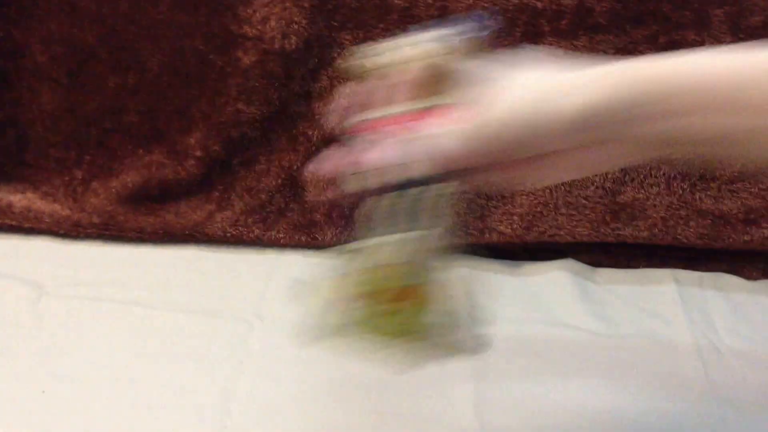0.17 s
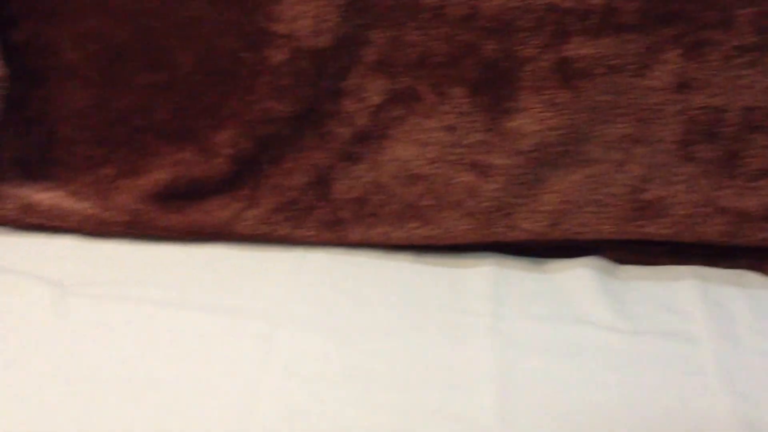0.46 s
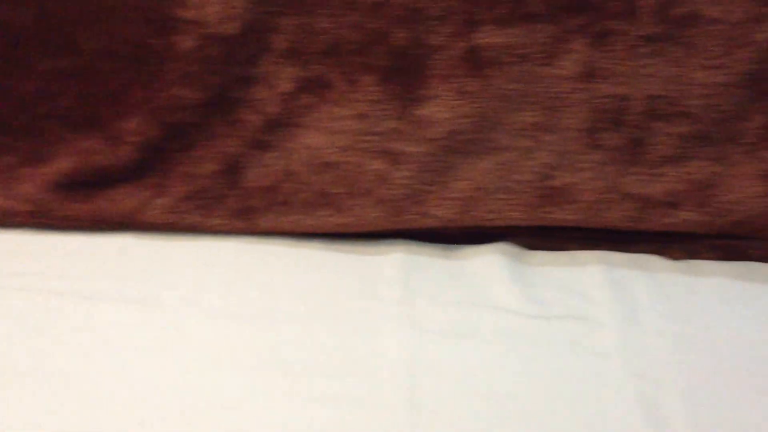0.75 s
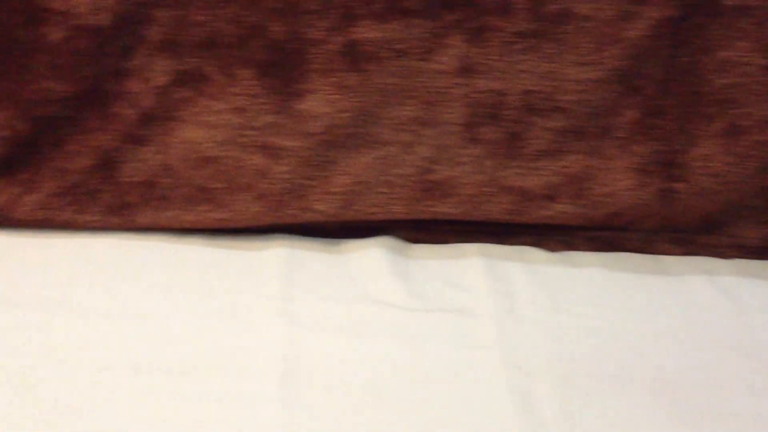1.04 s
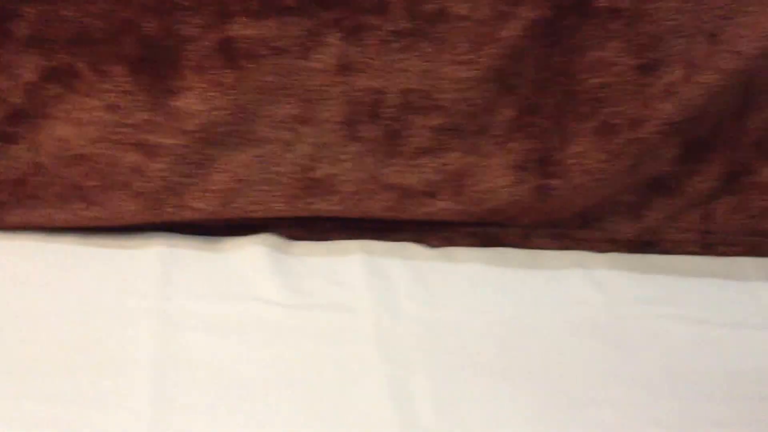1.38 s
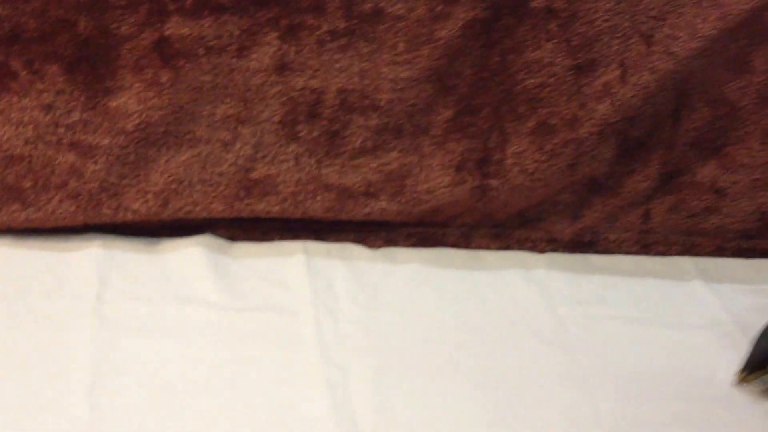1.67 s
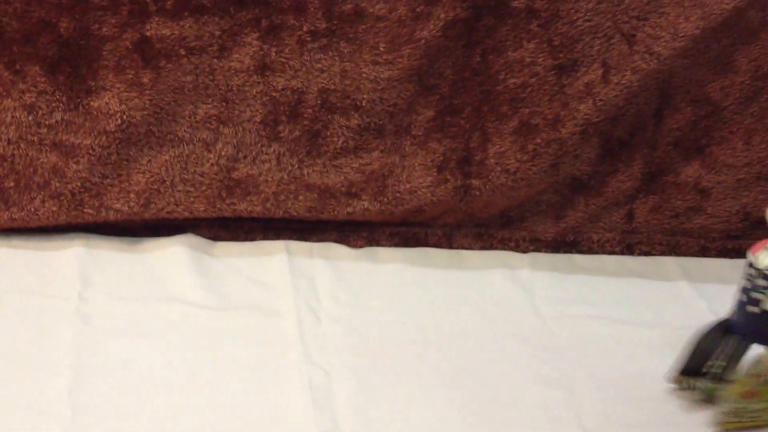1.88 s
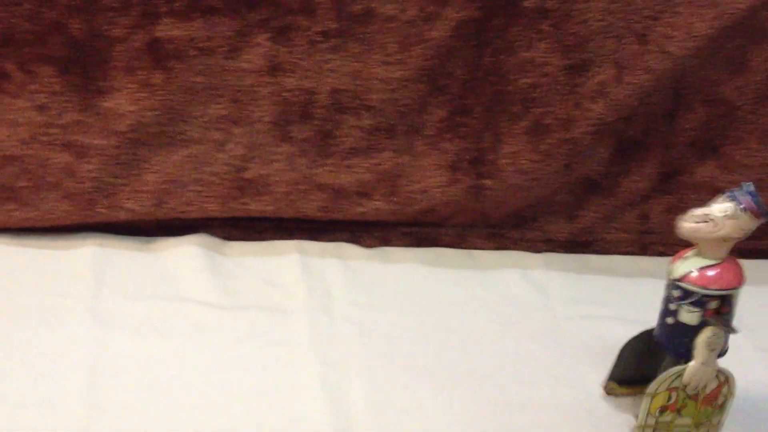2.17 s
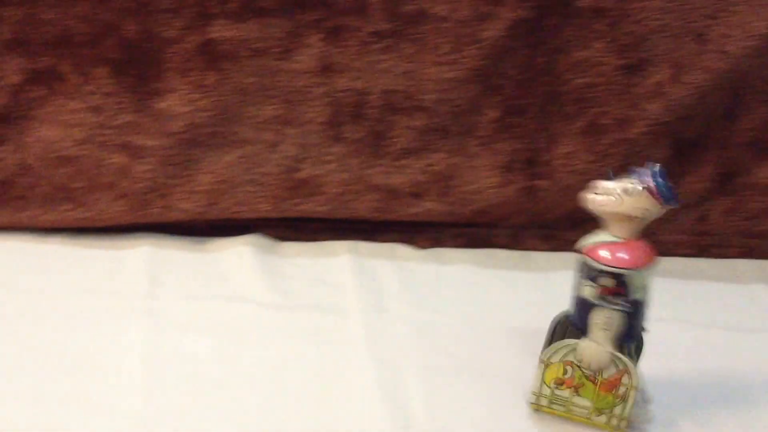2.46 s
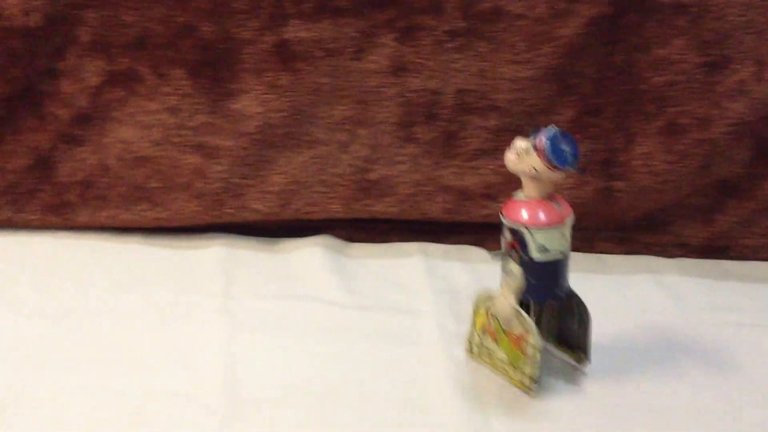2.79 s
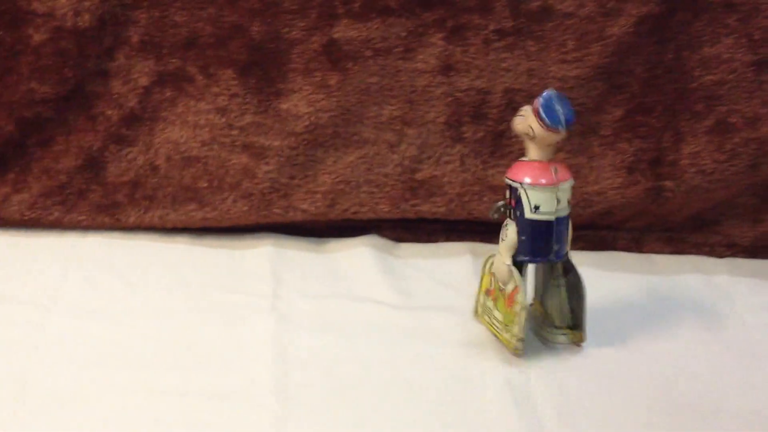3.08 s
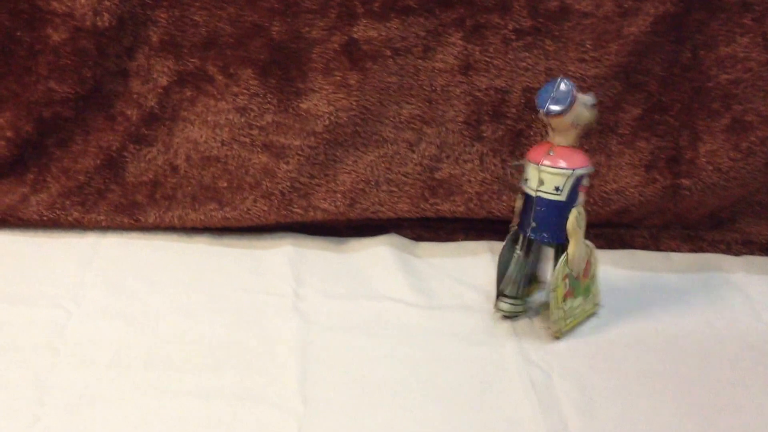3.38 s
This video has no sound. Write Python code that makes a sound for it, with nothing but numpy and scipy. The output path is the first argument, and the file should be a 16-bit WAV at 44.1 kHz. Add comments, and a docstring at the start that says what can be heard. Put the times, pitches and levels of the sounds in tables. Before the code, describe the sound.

Wind-up tin toy walking on a cloth-covered table, bright metallic clacks, loose rattles and gear whirring.

```python
"""A tin wind-up toy walks over a cloth-covered table in a small room.
Its cranked legs knock against the thin shell, fast while it is lifted, then in slower, limping steps.
Hard clacks and softer rattles are showers of tiny contacts that ring the tin, each at its own spot.
The clockwork whirrs underneath as uneven gear ticks, and some knocks leave the hollow torso humming."""
import sys
import numpy as np
from scipy import signal
from scipy.fft import rfft, irfft
from scipy.io import wavfile
from scipy.ndimage import uniform_filter1d

SR = 44100
rng = np.random.default_rng(int(sys.argv[2]) if len(sys.argv) > 2 else 0)


def transcribe(u):
    """Save the signal u as a 16-bit wav file named by the first command-line argument.

    u: samples, shape (n,) or (channels, n), limited to [-1, 1]; the rate is SR.
    q: integer samples, one column per channel.
    """
    v = np.clip(np.atleast_2d(u).T, -1, 1)
    q = np.round(v * 32767).astype(np.int16)
    wavfile.write(sys.argv[1], SR, q)


N = 156114  # length [samples]

# strongest rings of the tin shell, before scatter: (frequency [Hz], level [dB])
TIN_RINGS = [(1280, -2), (1976, -6), (3541, -7), (4947, 3.5), (6789, -1), (7063, 4), (7854, 0.5)]
# colour of the crowd of weaker shell modes: (frequency [Hz], relative level per Hz [dB])
CROWD_COLOUR = [(70, -35.5), (290, -4.5), (520, -12), (780, -6.5), (1000, -8.5), (1300, -4), (2050, -3),
                (3200, -4.5), (5000, -2.5), (7200, -1), (10300, -6), (13000, -2), (15200, -6.5)]
# whirr of the gear train, before the dips at the strikes: (time [s], level [dB])
WHIRR_LEVEL = [(0, -29.5), (1.55, -31), (1.66, -34), (1.71, -41.5), (1.91, -37), (1.97, -31.5),
               (2.84, -32.5), (3.28, -29.5), (3.39, -42), (3.44, -27.5)]
# hollow hum of the torso, level before its rise and fade: (time [s], frequency [Hz], level [dB])
TORSO_HUMS = [(.3, 800, -39.5), (.62, 764, -39), (3.42, 774, -37), (3.502, 815, -28.5)]
# hard strikes of the legs, level before KNOCK_DB: (time [s], level [dB], after-rattle [dB],
# body resonance [Hz], hollow body [dB], bright edge [dB])
HARD_STRIKES = [(0.023, -30, -2.5, 2000, 8, 2.5), (0.074, -27.5, -7, 2000, 2.5, 4.5),
                (0.155, -24.5, -1.5, 2090, 8, -1), (0.2, -26.5, -3.5, 2150, 2, 1),
                (0.527, -27.5, -4, 1880, 5, -2), (0.592, -24, -0.5, 2150, -3.5, -1),
                (0.723, -26, 0.5, 2270, 1.5, 0.5), (0.795, -28.5, -0.5, 1590, 7.5, -1.5),
                (1.376, -25.5, -5.5, 2070, -2, -4), (1.459, -30.5, -3.5, 1860, 6.5, -6.5),
                (1.627, -31.5, 3, 1930, 2.5, -10), (1.834, -25.5, -14, 1980, 0.5, -7.5),
                (1.846, -30, 0, 1970, 1, -4), (2.034, -27, 1.5, 2600, 1, -4.5),
                (2.111, -29.5, -1, 1310, -1, -5), (2.3, -26.5, -6, 2180, -3.5, -9),
                (2.336, -33, -13, 2260, 3.5, -1.5), (2.398, -25.5, -3, 2100, 0, -2),
                (2.536, -32, 0, 2220, -1.5, -2), (2.592, -26, 3, 2410, 5, -3.5),
                (2.781, -23, -12, 2610, 0, -7), (2.967, -24.5, -1, 2170, -3.5, -1),
                (3.111, -28.5, -0.5, 2250, 3.5, -1), (3.208, -30.5, -21, 2200, -7, -3.5),
                (3.501, -27.5, -1.5, 1940, 3, -1.5)]
# softer rattles as the legs swing, level before KNOCK_DB: (time [s], level [dB], chatter decay [s],
# body resonance [Hz], hollow body [dB], bright edge [dB])
LEG_RATTLES = [(0.058, -32, 0.0095, 2020, -16, 6), (0.272, -27.5, 0.03, 2200, 8.5, -0.5),
               (0.33, -26.5, 0.027, 1380, 1.5, 1), (0.4, -30.5, 0.0099, 1860, 3, 1),
               (0.462, -30.5, 0.013, 2050, 1, -1), (0.658, -29.5, 0.017, 1900, 7.5, 0.5),
               (0.859, -30, 0.011, 2220, -1, 3.5), (0.926, -27, 0.02, 2180, 1, -9),
               (0.991, -33.5, 0.006, 1990, -0.5, 1), (1.06, -31.5, 0.015, 2230, 1, -2.5),
               (1.121, -33, 0.019, 2170, 0.5, -1), (1.186, -30, 0.017, 2100, 3, -3.5),
               (1.247, -32, 0.016, 2040, 2.5, 2), (1.316, -31.5, 0.02, 1960, 4.5, -0.5),
               (1.492, -31, 0.032, 2040, -1.5, -6), (1.753, -32.5, 0.011, 2170, -4, -6),
               (1.782, -33, 0.003, 1940, -1, -3), (1.95, -34, 0.0089, 2700, -4.5, -11),
               (2.177, -28.5, 0.028, 2110, 0.5, -0.5), (2.492, -32.5, 0.017, 2400, 1.5, -1.5),
               (2.688, -31.5, 0.012, 2070, -3.5, -3.5), (2.73, -32.5, 0.013, 2100, -3.5, -5),
               (2.81, -33.5, 0.011, 2120, -1, -1), (2.882, -34.5, 0.03, 2600, -2.5, -0.5),
               (3.022, -29, 0.013, 2100, -0.5, -4.5), (3.246, -34.5, 0.037, 2030, 4.5, 0.5),
               (3.418, -29, 0.021, 1620, 2.5, -3)]

# anchor frequencies of the tone curves
THUD_HZ, BODY_HZ, MID_HZ, EDGE_HZ, TOP_HZ, LOW_CUT_HZ = 400, 1800, 5500, 12500, 15300, 95
# tin shell
RING_S = 0.3  # length of each knock and of each ring
SHELL_T60_S, MODES_T60_S = 0.029, 0.069
MODES_DB, MODE_SCATTER_DB, MODE_DETUNE = -19.5, 3, 0.0043  # detune: share of the frequency
# room
ROOM_T60_S, ROOM_DB, ROOM_DELAY_S = 0.25, -5.5, 0.0016
# clockwork
TOOTH_HZ, TOOTH_JITTER, TOOTH_SCATTER_DB, TOOTH_T60_S = 230.3, 0.25, 4.5, 0.028  # jitter: share of a gap
SCRAPE_DB, WHIRR_THUD_DB, STALL_S, STALL_DB = -8, -8, 0.06, -1
# contacts of the legs
CONTACTS_PER_S, CONTACT_SCATTER_DB = 1300, 3
FIRST_CONTACT, REBOUND_S, AFTER_S = 0.48, 0.0032, 0.025
RISE_SHARE, LOOSE_SHARE, LOOSE_S = 0.18, 0.13, 0.027
# tone of each knock
PATCHY_DB, LIFTED_DB, LIFTED_HZ, SET_DOWN_S = 2, 6, 8600, 0.38
BODY_PEAK_DB, BODY_SPREAD, SWING_THUD_DB = 4, 1.25, -36  # spread: frequency ratio to each flank
KNOCK_DB, KNOCK_S = 5, 0.025  # lift of all knocks; stretch whose level is set
# torso hum
BOOM_T60_S, BOOM_RISE_S = 0.18, 0.0016


def undb(db):
    """Turn decibels into an amplitude factor."""
    return 10 ** (np.asarray(db) / 20)


def unit(x):
    """Scale to unit energy."""
    return x / np.sqrt(np.sum(x ** 2) + 1e-18)


def fade(t, t60):
    """Exponential decay that falls by 60 dB in t60 seconds."""
    return np.exp(-np.log(1000) * t / t60)


def ring_time():
    """Time axis [s] of one knock or ring."""
    return np.arange(int(RING_S * SR)) / SR


def colour(x, points):
    """Minimum-phase filter through (frequency [Hz], gain [dB]) points, so nothing sounds ahead of the hit."""
    size = 4096
    hz, db = np.array(points, float).T
    grid_hz = np.arange(size // 2 + 1) * SR / size + 1
    log_gain = np.log(undb(np.interp(np.log(grid_hz), np.log(hz), db)))
    cepstrum = irfft(log_gain)[:size // 2]
    cepstrum[1:] *= 2  # folding the cepstrum makes the filter causal
    impulse = irfft(np.exp(rfft(cepstrum, size)))
    return signal.fftconvolve(x, impulse)[:len(x)]


def even(x, size=90):
    """Smooth out chance peaks and holes of the spectrum."""
    power = uniform_filter1d(np.abs(rfft(x)) ** 2, size) + 1e-18
    hz = np.linspace(1, SR / 2, len(power))
    return colour(x, np.c_[hz, -10 * np.log10(power)])


def shell_ring(t60):
    """The tin struck at one spot: a crowd of short modes and a few longer rings, weighted anew each time."""
    t = ring_time()
    noise = rng.standard_normal(len(t)) * fade(t, t60)
    crowd = unit(colour(even(noise), CROWD_COLOUR))
    chance = np.clip(rng.standard_normal((len(TIN_RINGS), 3)), -2, 2)
    rings = np.zeros(len(t))
    for (hz, db), (weight, phase, detune) in zip(TIN_RINGS, chance):
        cycles = hz * (1 + MODE_DETUNE * detune) * t + phase
        rings += undb(db + MODE_SCATTER_DB * weight) * np.sin(2 * np.pi * cycles)
    return crowd + undb(MODES_DB) * rings * np.sqrt(2) * unit(fade(t, MODES_T60_S))


def room(x):
    """Short, dense reflections of a small furnished room, drawn anew for each sound."""
    t = ring_time()
    build_up = 1 - np.exp(-t / ROOM_DELAY_S)
    tail = unit(rng.standard_normal(len(t)) * fade(t, ROOM_T60_S) * build_up)
    return x + undb(ROOM_DB) * signal.fftconvolve(x, tail)[:len(x)]


def clockwork(count=1500, spots=12):
    """Gear teeth tick unevenly at several spots of the shell, and labour just before each hard strike."""
    gap, size, sign = rng.standard_normal((count, 3)).T
    at = (np.cumsum(np.abs(1 + TOOTH_JITTER * gap)) * SR / TOOTH_HZ).astype(int)
    strength = np.sign(sign) * undb(TOOTH_SCATTER_DB * np.clip(size, -2, 1))
    whirr = np.zeros(N)
    for k in range(spots):  # the spots take the teeth in turn
        ticks = np.bincount(at[k::spots], strength[k::spots], N)[:N]
        scrape = unit(rng.standard_normal(N))
        force = unit(ticks) + undb(SCRAPE_DB) * scrape
        whirr += signal.fftconvolve(force, room(shell_ring(TOOTH_T60_S)))[:N]
    whirr = colour(whirr, [(THUD_HZ, WHIRR_THUD_DB), (BODY_HZ, 0)])
    t = np.arange(N) / SR
    load = sum(np.exp(-((t - strike[0]) / STALL_S + 0.5) ** 2) for strike in HARD_STRIKES)
    level_db = np.interp(t, *np.array(WHIRR_LEVEL).T) + STALL_DB * load
    return whirr / whirr.std() * undb(level_db)


def contacts(envelope):
    """A shower of tiny contacts of uneven strength, pushing either way."""
    size = len(envelope)
    hits = (rng.random(size) < CONTACTS_PER_S / SR) * np.sign(rng.standard_normal(size))
    scatter = undb(CONTACT_SCATTER_DB * np.clip(rng.standard_normal(size), -2, 2))
    return unit(hits * envelope * scatter)


def clack(loose_db):
    """A hard first contact, a few quick rebounds, then loose parts rattle on."""
    t = ring_time()
    rebound = np.exp(-t / REBOUND_S)
    loose = np.exp(-t / AFTER_S) * (1 - rebound)
    force = contacts(rebound) + undb(loose_db) * contacts(loose)
    force[0] += FIRST_CONTACT
    return force


def rattle(chatter_s):
    """Tiny contacts swell and die away, more gently in slow swings."""
    t = ring_time()
    rise = 1 - np.exp(-t / (RISE_SHARE * chatter_s))
    decay = np.exp(-t / chatter_s) + LOOSE_SHARE * np.exp(-t / LOOSE_S)
    return contacts(rise * decay)


def spot_colour(x, start, count=20):
    """Each spot favours its own treble modes; held in the air, the toy rings brighter."""
    patch_db = PATCHY_DB * np.clip(rng.standard_normal(count), -2, 2)
    patches = np.c_[np.geomspace(BODY_HZ, TOP_HZ, count), patch_db]
    lifted = [(MID_HZ, 0), (LIFTED_HZ, LIFTED_DB * (start < SET_DOWN_S)), (EDGE_HZ, 0)]
    return colour(colour(x, patches), lifted)


def add_knock(out, force, start, db, body_hz, body_db, edge_db):
    """A force rings the shell; each spot has its own body resonance and brightness."""
    ringing = signal.fftconvolve(even(force), shell_ring(SHELL_T60_S))[:len(force)]
    sound = spot_colour(ringing, start)
    sound = sound / np.sqrt(np.mean(sound[:int(KNOCK_S * SR)] ** 2))
    flank_db = body_db - BODY_PEAK_DB
    sound = colour(sound, [
        (THUD_HZ, SWING_THUD_DB - db),  # offsets the knock's level, so the thump stays about equal
        (body_hz / BODY_SPREAD, flank_db),
        (body_hz, body_db + BODY_PEAK_DB),
        (body_hz * BODY_SPREAD, flank_db),
        (MID_HZ, 0),
        (EDGE_HZ, edge_db)])
    i = int(start * SR)
    out[i:i + len(sound)] += undb(db + KNOCK_DB) * room(sound)


def legs():
    """Hard strikes and softer rattles; every one thumps the table about equally."""
    out = np.zeros(N + SR)
    for start, db, loose_db, *tone in HARD_STRIKES:
        add_knock(out, clack(loose_db), start, db, *tone)
    for start, db, chatter_s, *tone in LEG_RATTLES:
        add_knock(out, rattle(chatter_s), start, db, *tone)
    return out[:N]


def torso():
    """Now and then the lowest mode of the hollow body is set ringing: a sine with a quick rise and a fade."""
    out = np.zeros(N)
    for start, hz, db in TORSO_HUMS:
        t = np.maximum(np.arange(N) / SR - start, 0)
        rise = 1 - np.exp(-t / BOOM_RISE_S)
        out += undb(db) * np.sin(2 * np.pi * hz * t) * fade(t, BOOM_T60_S) * rise
    return out


def scene():
    """The whirr, the knocking legs and the humming torso together, in one channel."""
    return (clockwork() + legs() + torso())[None]


def record(dry):
    """Thin the bass and cut the top steeply."""
    low_cut = signal.butter(2, LOW_CUT_HZ, "high", fs=SR, output="sos")
    top_cut = signal.ellip(12, 0.2, 80, TOP_HZ, fs=SR, output="sos")
    return signal.sosfilt(top_cut, signal.sosfilt(low_cut, dry))


dry = scene()
out = record(dry)
transcribe(out)
```